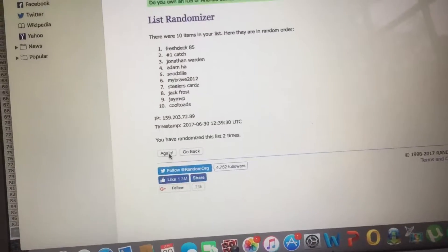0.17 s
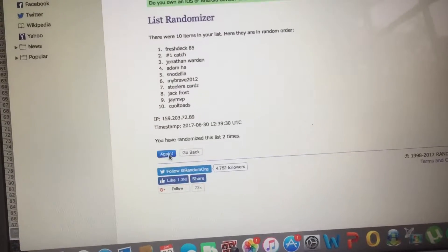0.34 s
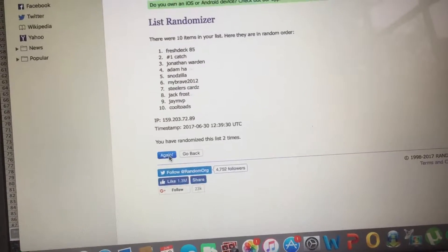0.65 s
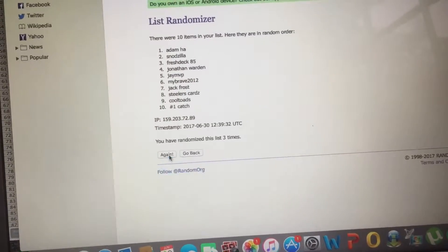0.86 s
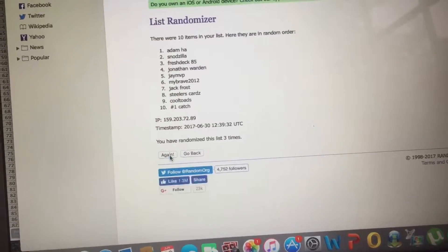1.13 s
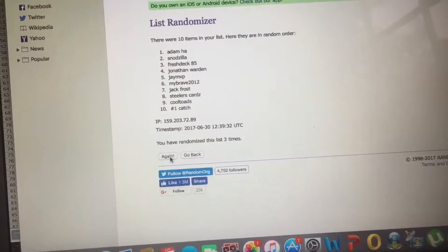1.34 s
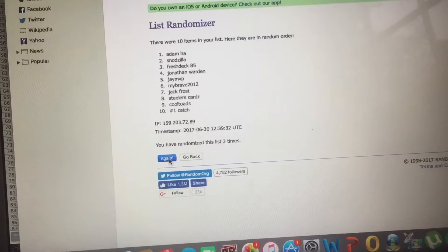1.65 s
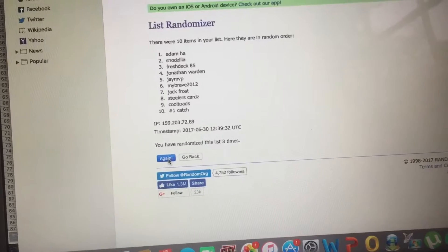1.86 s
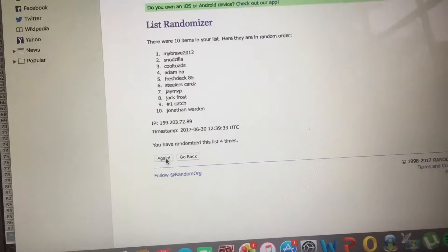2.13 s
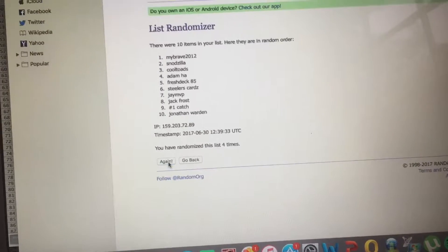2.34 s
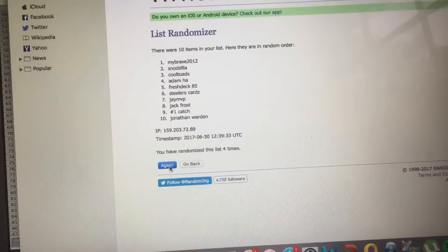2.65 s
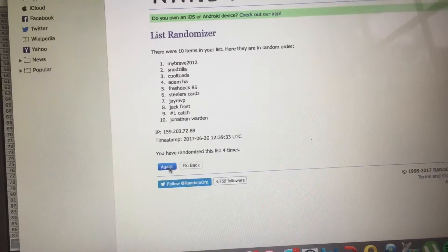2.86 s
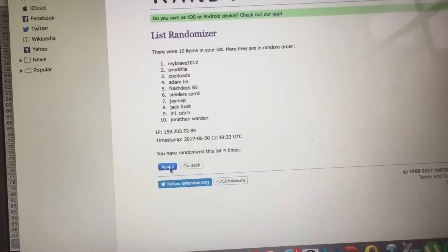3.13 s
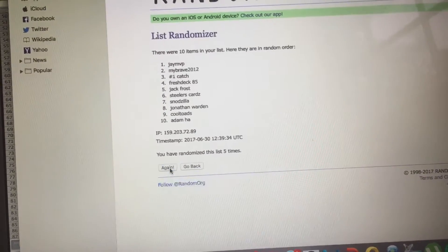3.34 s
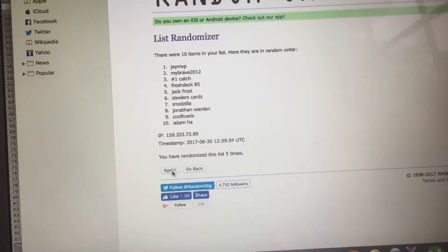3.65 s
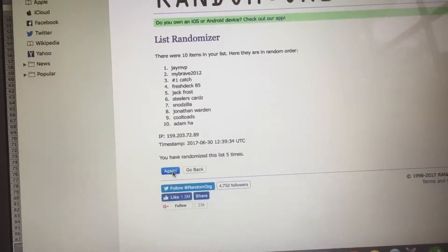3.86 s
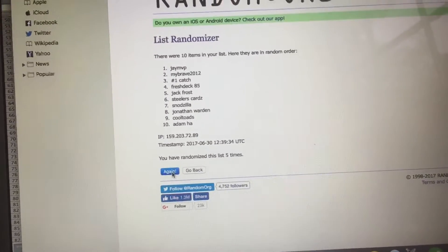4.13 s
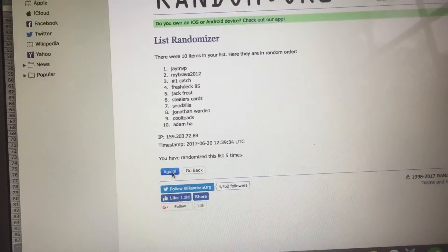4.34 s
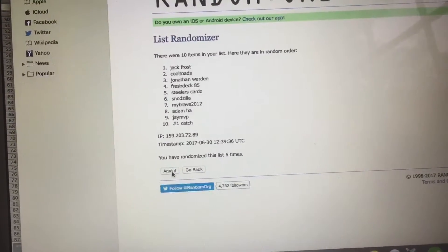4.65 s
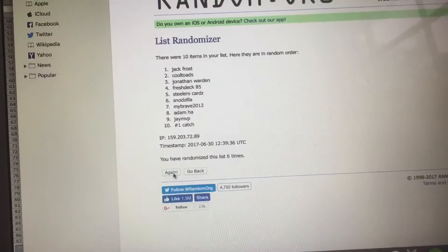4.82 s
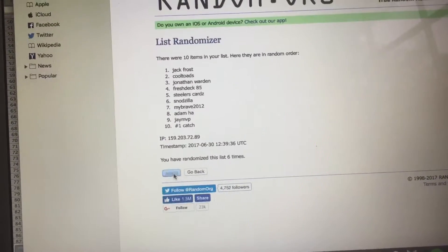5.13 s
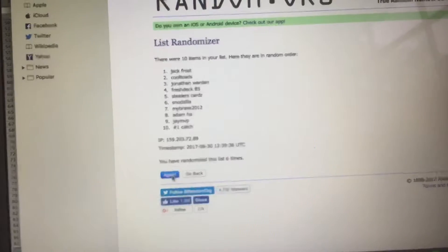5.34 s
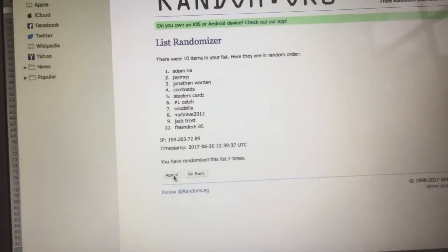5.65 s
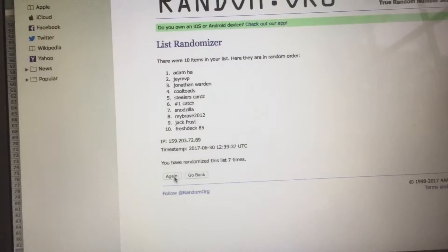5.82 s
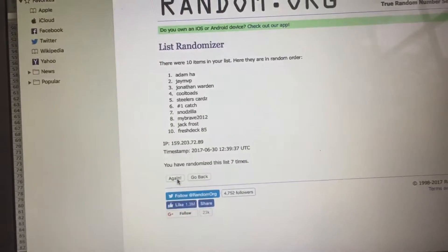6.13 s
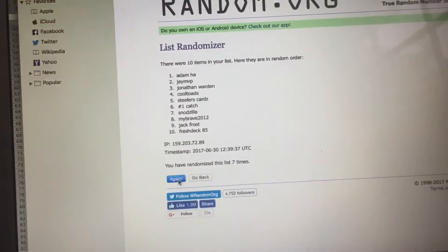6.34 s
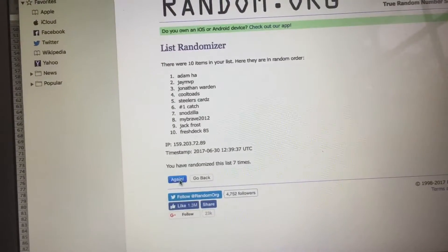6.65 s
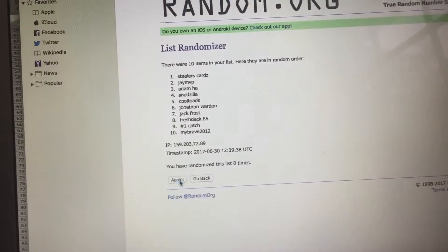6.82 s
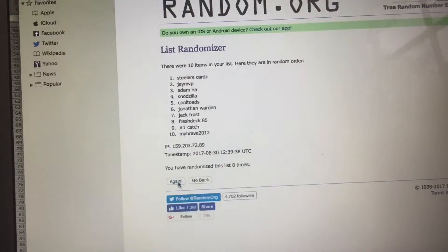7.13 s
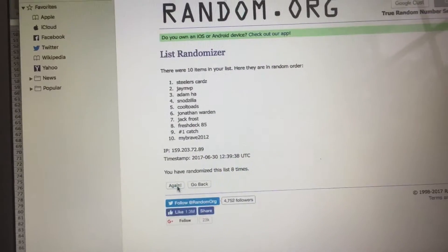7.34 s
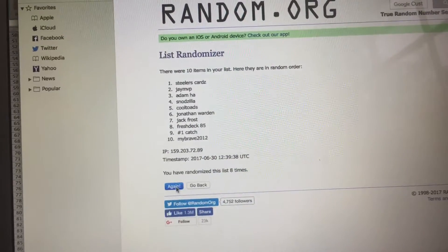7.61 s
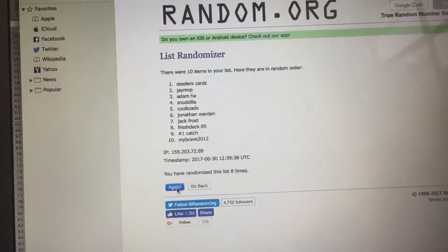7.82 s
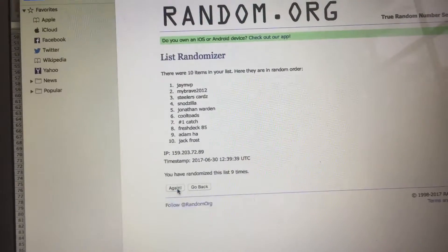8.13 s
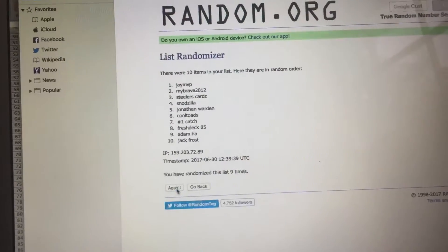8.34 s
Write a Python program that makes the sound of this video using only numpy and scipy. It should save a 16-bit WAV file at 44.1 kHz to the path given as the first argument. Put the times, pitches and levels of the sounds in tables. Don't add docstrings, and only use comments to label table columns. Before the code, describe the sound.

In a small quiet room, a finger clicks a flat pad roughly once a second, close to a handheld phone microphone. Each press is a sharp dry snap, followed shortly by a softer springy release and small thud. Hands brush and bump the desk between clicks. Beneath lie low hum, soft hiss and very faint steady ticking.

```python
import sys
import numpy as np
from scipy import signal
from scipy.fft import rfft, irfft
from scipy.io import wavfile
from scipy.ndimage import uniform_filter1d

SR = 44100
rng = np.random.default_rng(int(sys.argv[2]) if len(sys.argv) > 2 else 0)


def wrap_up_sound(samples):
    columns = np.atleast_2d(samples).T
    tamed = np.clip(columns, -1, 1)
    steps = np.round(tamed * 32767).astype(np.int16)
    wavfile.write(sys.argv[1], SR, steps)


def volts_from_db(level):
    exponent = np.asarray(level, float) / 20
    return 10 ** exponent


N = 373968

# pitch_hz, level_db
HUSH_SPECTRUM = [(18, -31), (30, -11.5), (53, 1.5), (86, -10), (106, -6), (141, -9.5), (197, -5.5),
                 (230, -13.5), (438, -18.5), (581, -25), (878, -21), (1400, -23.5), (2160, -25.5),
                 (2870, -28.5), (14200, -38.5)]
# start_s, level_db
RUMBLE_LEVELS = [(0, -68.5), (0.9, -68), (1.2, -68), (1.6, -66.5), (1.8, -65), (2.1, -71), (2.5, -69),
                 (3.2, -64.5), (3.64, -69.5), (3.9, -65.5), (4.3, -66.5), (4.55, -68), (5.0, -69),
                 (6.3, -63), (6.75, -67), (7.5, -61), (8.27, -69.5), (8.48, -67)]
# pitch_hz, level_db
PORT_RESPONSE = [(4300, 0), (4900, -2), (5500, 1), (6300, 1), (6900, 0), (9800, 0), (10500, -4), (11300, 0),
                 (14400, 0), (14550, -5), (15100, -5), (15200, 2)]
# pitch_hz, level_db
BAND_EDGE = [(15720, 0), (15780, -30)]
# low_hz, high_hz, level_db, t60_s
ROOM_BANDS = [(70, 328, -39.5, 0.46), (268, 580, -39, 0.29), (710, 1300, -37, 0.31),
              (1350, 1990, -36.5, 0.45), (1950, 2570, -38.5, 0.33), (2490, 3630, -50, 0.63),
              (3270, 5200, -49, 0.27), (4670, 10500, -50, 0.3), (9800, 15600, -56, .25)]
# delay_s, level_db, low_hz, high_hz
FIRST_ECHOES = [(0.0108, -28, 2500, 15000), (0.0112, -16, 500, 1300), (0.0157, -21, 700, 5000),
                (0.027, -29, 600, 2600), (0.0329, -37, 600, 2600)]

LENS_STEP_DB = [-68, -48.5, -53.5, -50, -49, -55.5, -52.5, -51, -50.5, -55, -52.5, -51, -53.5, -56, -50,
                -60, -49.5, -69, -50.5, -50.5, -51, -50.5, -55.5, -52, -50.5, -54, -54.5, -50]
# start_s, peak_db
ODD_TICKS = [(0.0993, -54), (0.5726, -60), (1.5762, -50), (3.582, -59), (4.586, -53.5), (5.22, -48),
             (6.5927, -56.5), (7.5958, -49.5), (7.7797, -60)]
# pitch_hz, level_db, t60_s
MOTOR_MODES = [(2340, 0.5, 0.0029), (3280, -6, 0.003), (5400, 0.5, 0.0021), (7680, -4.5, 0.0081),
               (8320, -5.5, 0.0049), (11300, -5.5, 0.0023), (13800, -9, 0.0027), (15400, -12, 0.0037)]

# peak_s, peak_db, pitch_hz
LIGHT_TOUCHES = [(0.1808, -52, 155), (0.958, -49.5, 87), (1.7403, -50, 138), (2.0959, -45, 154),
                 (2.5715, -48.5, 152), (2.8, -51, 150), (2.82, -55, 99), (3.164, -49, 60),
                 (3.4435, -51, 73), (3.588, -50, 140), (3.6032, -49.5, 138), (3.674, -52, 140),
                 (4.205, -51, 244), (4.341, -57, 200), (4.7913, -51.5, 109), (5.4183, -49, 163),
                 (5.5367, -59, 122), (6.032, -54, 200), (6.073, -48.5, 71), (6.16, -54.5, 100),
                 (6.333, -46.5, 130), (6.607, -51, 70), (7.203, -59, 113), (7.256, -51.5, 66),
                 (7.607, -46, 84), (7.829, -51.5, 70), (7.9853, -49, 166), (8.0176, -51, 74),
                 (8.41, -50, 200)]
# peak_s, peak_db, pitch_hz, length_cycles
DESK_BUMPS = [(0.502, -40, 109, 1.4), (0.5148, -36.5, 110, 0.9), (0.9997, -48, 422, 4.5),
              (1.9412, -42, 121, 1.7), (2.0186, -34, 180, 1.23), (2.3645, -43.5, 188, 3),
              (2.76, -44, 193, 3.3), (2.919, -57, 220, 6.5), (3.1463, -41, 92, 1.6),
              (3.3685, -38, 162, 2.6), (3.686, -42, 160, 4), (3.6995, -40.5, 152, 2.6),
              (3.929, -30, 121, 1), (4.2393, -46.5, 64.3, 4.3), (4.37, -56, 192, 11),
              (6.045, -43.5, 197, 7.5), (6.3035, -30.5, 264, 1.96), (6.3095, -26.5, 143, 1.8),
              (6.3135, -39.5, 298, 2.9), (6.3615, -41.5, 127, 2.7), (6.564, -45.5, 197, 4.3),
              (7.36, -54.5, 140, 2.1), (7.4512, -32, 256, 1.3), (7.4558, -33, 172, 2.8),
              (7.467, -38, 120, 2), (8.3388, -32.5, 180, 2.9), (8.36, -34, 222, 2.9),
              (8.366, -32, 149, 1.4), (8.443, -40.5, 183, 2.9)]
# peak_s, peak_db
KNUCKLE_KNOCKS = [(0.472, -51.5), (3.138, -53), (3.369, -51), (3.691, -51.5), (6.046, -49.5),
                  (8.339, -40.5), (8.36, -41.5), (8.4293, -31)]

# start_s, peak_db, pitch_hz, overtones_db
PLATE_TAPS = [(0.466, -36.5, 1620, -8), (0.592, -52.5, 2200, -25), (0.997, -40.5, 1590, -33),
              (1.118, -55, 1550, -12), (1.696, -43, 1720, -3), (2.184, -45.5, 846, -13),
              (2.56, -39.5, 1590, -18), (2.75, -40.5, 1500, -9), (3.9092, -30, 1750, -18),
              (4.074, -38.5, 1560, -15), (5.127, -52.5, 1675, -12), (5.366, -40, 1610, -12),
              (6.287, -53.5, 1660, -5), (6.568, -38, 1520, -7.5), (6.299, -47.5, 776, -15),
              (7.448, -53, 1400, -9), (7.589, -38.5, 1730, -11), (7.8, -39, 1680, -14)]
# pitch_multiple, level_db, t60_s
TAP_MODES = [(1, 0, 0.015), (.5, 3.5, 0.0095), (1.15, -11, .012), (1.3, 8, 0.008), (1.6, -2.5, 0.0059),
             (1.85, 0, 0.0067)]
# start_s, spring_db, thud_db
PLATE_RELEASES = [(0.439, -24.5, -30.5), (1.665, -25, -31.5), (2.733, -26.5, -32), (4.042, -26, -34),
                  (5.341, -25.5, -32), (6.537, -27, -34.5), (7.767, -25, -34.5)]
# pitch_hz, level_db, t60_s
SPRING_MODES = [(140, -26, 0.14), (187, -25.5, 0.19), (253, -32, 0.041), (460, -8.5, 0.0068),
                (830, -13.5, 0.0067), (1005, -10.5, 0.0066)]

# start_s, peak_db
FINGER_PRESSES = [
    (0.3388, -22),
    (1.5662, -21.5),
    (2.6269, -22),
    (3.9175, -21.5),
    (3.936, -20.5),
    (5.234, -21),
    (6.412, -22),
    (7.651, -22.5),
]
# lag_s, level_db
CONTACT_BOUNCES = [(-.0009, 9), (-.0003, -4), (.0001, 3), (.0005, 3.5), (.0017, -14)]
# pitch_hz, level_db, t60_s
SWITCH_MODES = [(5000, -31.5, 0.024), (5550, -8, 0.0077), (6180, -10, 0.013), (6970, -7, 0.0039),
                (7140, -5, 0.006), (8260, 0.5, 0.0027), (9270, -2.5, 0.0037), (10470, -4.5, 0.0025),
                (12800, -7.5, 0.0029), (13400, -17, 0.0058), (14600, -7, 0.0023)]
# pitch_hz, level_db, t60_s
PLATE_MODES = [(1054, 1.5, 0.012), (1300, -19.5, 0.12), (1500, -7.5, 0.012), (1659, 20, 0.0078),
               (1720, -13, 0.0047), (2086, -3.5, 0.027), (2450, -11, 0.051)]
# pitch_hz, level_db, t60_s
FRAME_MODES = [(2860, -4.5, 0.019), (3090, 4, 0.01), (3393, -2.5, 0.012), (3850, -19, 0.029),
               (4410, 3, 0.0072), (4890, -21.5, 0.014)]
# pitch_hz, level_db, t60_s
DESK_MODES = [(130, 2, 0.025), (210, 3.5, 0.025), (478, 14.5, 0.011), (896, 2, 0.019)]


def band(x, low_hz, high_hz):
    return signal.sosfilt(signal.butter(2, [low_hz, high_hz], "bandpass", fs=SR, output="sos"), x)


def colour(x, points):
    hz, db = np.transpose(points)
    f = np.maximum(np.fft.rfftfreq(len(x), 1 / SR), 1)
    gain = volts_from_db(np.interp(np.log(f), np.log(hz), db))
    return irfft(rfft(x) * gain, len(x))


def walk(rate_hz):
    hold = int(SR / rate_hz)
    steps = np.repeat(rng.standard_normal(N // hold + 1), hold)
    return 1.04 * uniform_filter1d(uniform_filter1d(steps, hold), hold)[:N]


def add(out, s, shape, size=4096):
    i = np.arange(int(s * SR) + 1, min(int(s * SR) + size, N))
    out[i] += shape(i / SR - s)


def ring(t, modes, rise_s, sign=-1.028):
    hz, db, t60 = np.transpose(modes)[:, :, None]
    signs = sign ** np.arange(len(modes))[:, None]
    waves = signs * volts_from_db(db) * np.sin(2 * np.pi * hz * t) * np.exp(-np.log(1000) * t / t60)
    return waves.sum(axis=0) * (1 - np.exp(-t / rise_s))


def hush(level_db=-62.5, flutter_db=4.0, split_hz=140):
    noise = colour(rng.standard_normal(N), HUSH_SPECTRUM)
    low = signal.sosfiltfilt(signal.butter(2, split_hz, fs=SR, output="sos"), noise)
    s, db = np.transpose(RUMBLE_LEVELS)
    drift_db = np.interp(np.arange(N) / SR, s, db - db.mean())
    mix = noise - low + low * volts_from_db(drift_db + flutter_db * walk(8.2))
    return mix * volts_from_db(level_db) / np.sqrt(np.mean(noise ** 2))


def room(x, gap_s=0.00088):
    t = np.arange(SR // 2) / SR
    build = 1 - np.exp(-(t / gap_s) ** 2)
    echo = 0
    for low_hz, high_hz, db, t60 in ROOM_BANDS:
        fade = rng.standard_normal(len(t)) * np.exp(-np.log(1000) * t / t60) * build
        fade = band(band(fade, low_hz, high_hz), low_hz, high_hz)
        echo = echo + volts_from_db(db) * fade / np.std(fade[:2048])
    return signal.fftconvolve(x, echo)[:N]


def blows(thud_db=-9, tap_db=-3):
    out = np.zeros(N)
    for table, share_db in ((FINGER_PRESSES, 0), (PLATE_TAPS, tap_db), (PLATE_RELEASES, thud_db)):
        for s, db, *_ in table:
            out[int(s * SR)] += volts_from_db(db + share_db + 1.5)
    return out


def echoes(x):
    out = np.zeros(N)
    for delay_s, db, low_hz, high_hz in FIRST_ECHOES:
        out += volts_from_db(db) * band(np.roll(x, int(delay_s * SR)), low_hz, high_hz)
    return out


def squeak(start_s=1.124, length_s=0.44, rise_s=0.008, drop_s=0.025, pitch_hz=2180, width_hz=70):
    t = np.clip(np.arange(N) / SR - start_s, 0, length_s)
    shape = np.minimum(t / rise_s, 1) * np.minimum((length_s - t) / drop_s, 1)
    db = -61 - 18 * (1 - np.exp(-t / drop_s)) + 2.5 * walk(12)
    air = band(rng.standard_normal(N), pitch_hz - width_hz, pitch_hz + width_hz)
    return shape * volts_from_db(db) * air / air.std()


def lens(first_s=0.1694, every_s=0.30003, echo_s=0.0055, echo_db=-10):
    out = np.zeros(N)
    beat = [(first_s + k * every_s, db) for k, db in enumerate(LENS_STEP_DB)]
    for s, db in beat + ODD_TICKS:
        for lag, drop_db in ((0.0006, 0), (0.00066 + echo_s, echo_db)):
            add(out, s + lag, lambda t: volts_from_db(db + drop_db + 3.5) * ring(t, MOTOR_MODES, 0.00035), size=1024)
    return out


def thud(out, s, db, hz, cycles, glide=0.27, soft=3.7, lean=0.12):
    span = max(cycles, 0.3) / hz / 2

    def wave(t):
        turns = hz * span * (1 + glide) / glide * np.log((1 + glide * t / span) / (1 + glide))
        swell = (t / span * np.exp(1 - t / span)) ** soft
        return volts_from_db(db) * swell * np.sin(2 * np.pi * (turns + lean))

    add(out, s - span + lean / hz, wave, size=8192)


def desk_thuds():
    out = np.zeros(N)
    for s, db, hz, cycles in DESK_BUMPS:
        thud(out, s, db, hz, cycles)
    for s, db, hz in LIGHT_TOUCHES:
        thud(out, s, db, hz, cycles=2.44)
    for s, db in KNUCKLE_KNOCKS:
        thud(out, s, db, hz=356, cycles=4)
    for s, _, db in PLATE_RELEASES:
        thud(out, s + 0.0057, db, hz=220, cycles=1.61)
    return out


def springs():
    out = np.zeros(N)
    for s, db, _ in PLATE_RELEASES:
        add(out, s, lambda t: volts_from_db(db + 6.0) * ring(t, SPRING_MODES, 0.002), size=8192)
    return out


def taps(rebound_s=0.0024, rebound_db=-4):
    out = np.zeros(N)
    for s, db, hz, over_db in PLATE_TAPS:
        modes = np.array(TAP_MODES) * [hz, 1, 1]
        modes[1:, 1] += over_db
        add(out, s, lambda t: volts_from_db(db + over_db - 14) * ring(t, SWITCH_MODES, 0.0002), size=1024)
        for lag, drop_db in ((0, 0), (rebound_s, rebound_db)):
            add(out, s + lag, lambda t: volts_from_db(db + drop_db) * ring(t, modes, 0.001))
    return out


def creak(lead_s=0.05, swell_s=0.012, share_db=-42):
    push = np.zeros(N)
    for s, db in FINGER_PRESSES:
        add(push, s - lead_s, lambda t: volts_from_db(db + share_db) * np.exp((t - lead_s) / swell_s), size=SR // 20)
    crackle = [(200, -25), (700, 19), (2000, 17.0), (6000, 5), (15000, -2)]  # pitch_hz, level_db
    return push * colour(rng.standard_normal(N), crackle)


def switch_chatter(out, s, db):
    for lag, bounce_db in CONTACT_BOUNCES:
        late, loud = rng.standard_normal(2)
        level = volts_from_db(db + bounce_db + 1.0 * loud - 23.0)
        add(out, s + lag + 1.5e-5 * late, lambda t: level * ring(t, SWITCH_MODES, 6e-5), size=1024)


def presses():
    out = np.zeros(N)
    for s, db in FINGER_PRESSES:
        switch_chatter(out, s, db)
        add(out, s + 0.00004, lambda t: -volts_from_db(db - 0.5) * ring(t, PLATE_MODES, 0.0011, sign=0.86))
        add(out, s - 0.00015, lambda t: -volts_from_db(db - 9) * ring(t, FRAME_MODES, 0.00059))
        add(out, s + 0.0011, lambda t: volts_from_db(db - 14.0) * ring(t, DESK_MODES, 0.0019))
    return out


def scene():
    phone = hush() + squeak() + lens()
    low = desk_thuds()
    snap = presses()
    walls = room(blows() + volts_from_db(-32.5) * low) + echoes(snap)
    pad = springs() + taps() + creak() + snap
    return (phone + walls + low + pad)[None]


def top_cut(x):
    return signal.sosfilt(signal.butter(12, 16760, fs=SR, output="sos"), x)


def record(dry):
    ported = colour(dry[0], PORT_RESPONSE)
    mix = colour(ported, BAND_EDGE)[None]
    return top_cut(mix)


dry = scene()
out = record(dry)
wrap_up_sound(out)
```